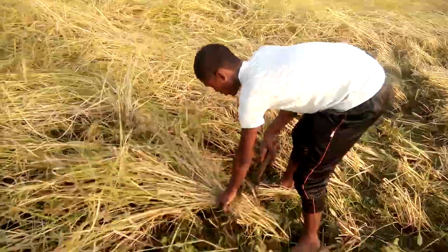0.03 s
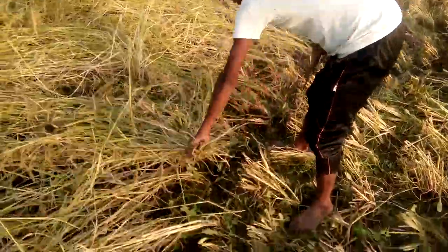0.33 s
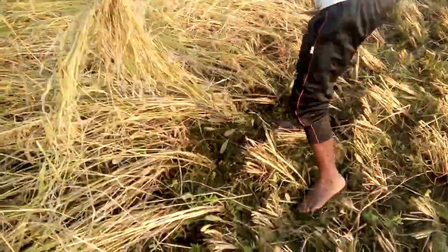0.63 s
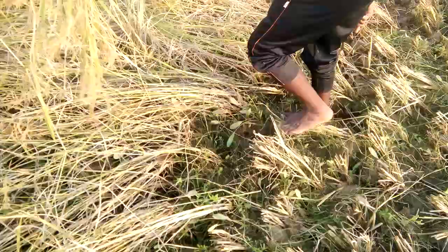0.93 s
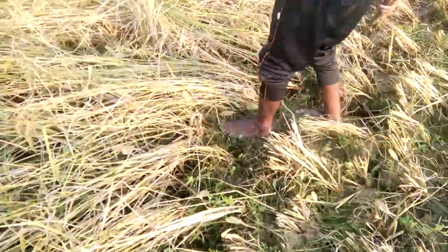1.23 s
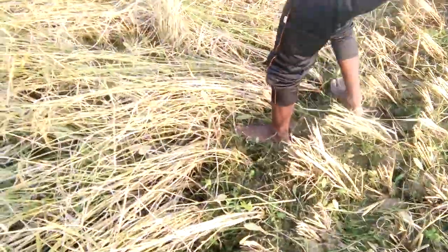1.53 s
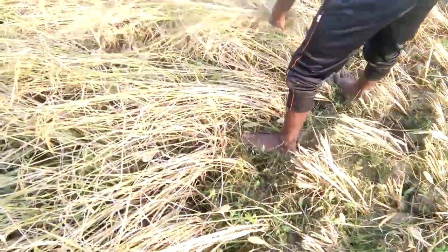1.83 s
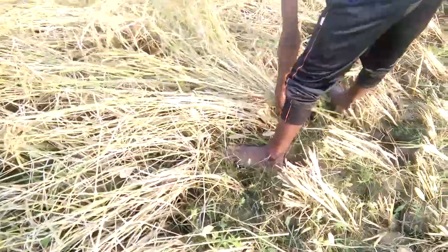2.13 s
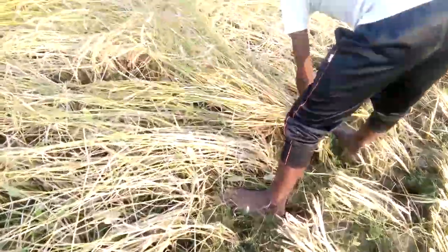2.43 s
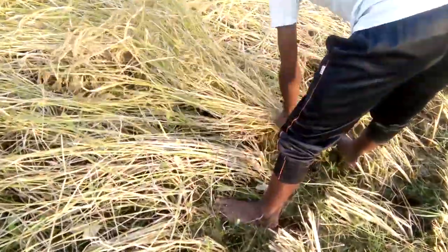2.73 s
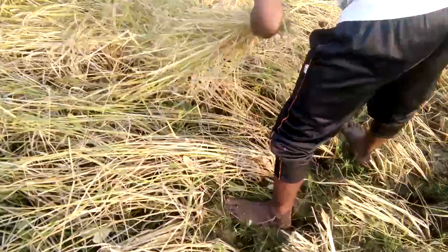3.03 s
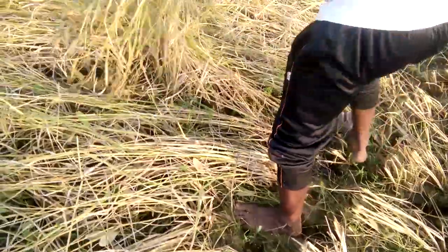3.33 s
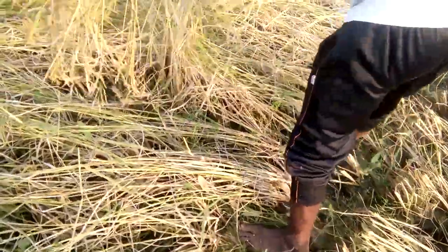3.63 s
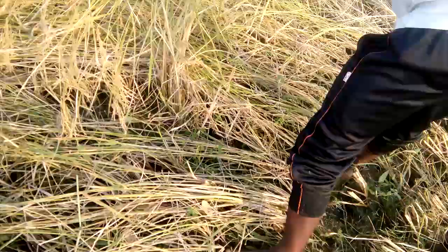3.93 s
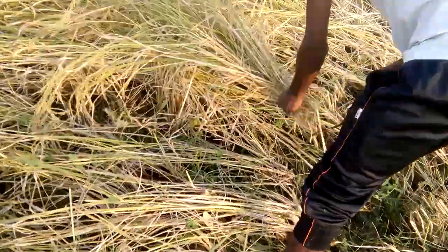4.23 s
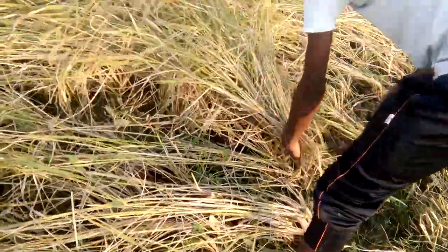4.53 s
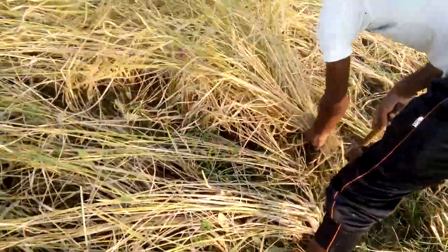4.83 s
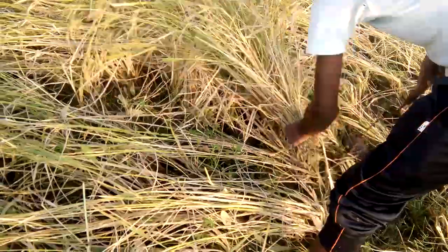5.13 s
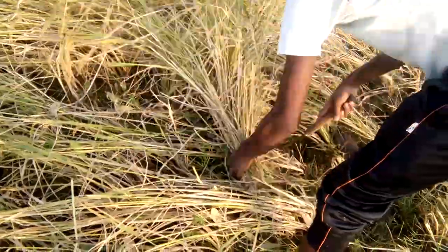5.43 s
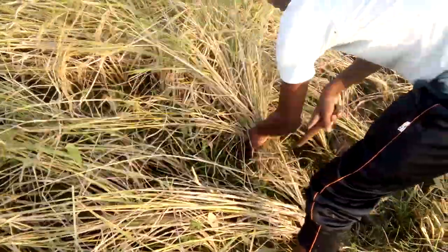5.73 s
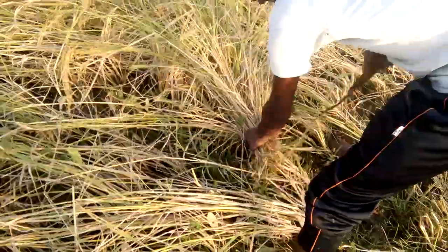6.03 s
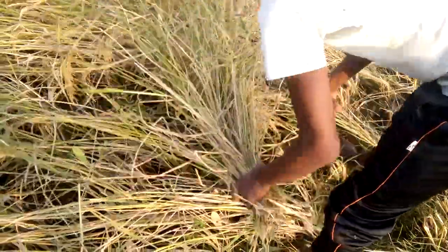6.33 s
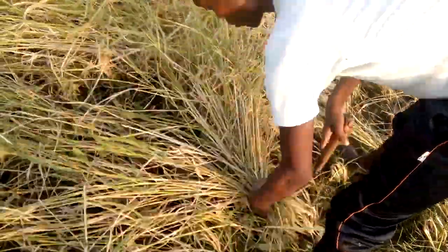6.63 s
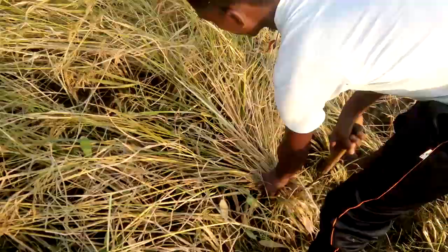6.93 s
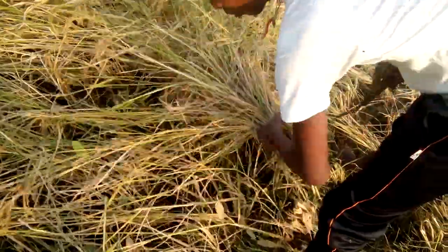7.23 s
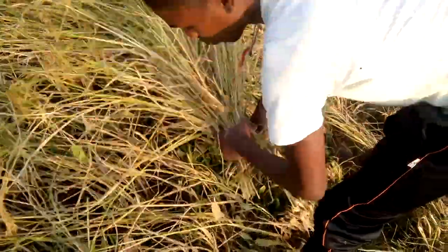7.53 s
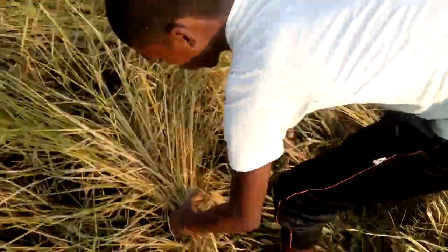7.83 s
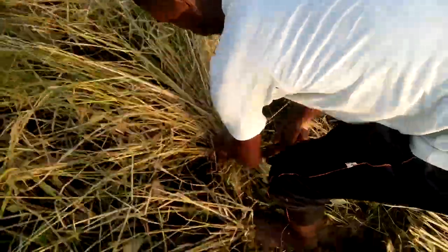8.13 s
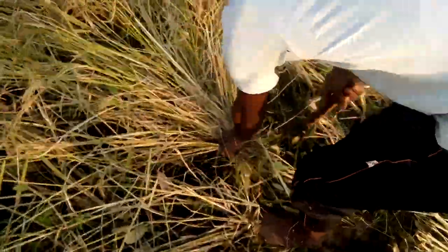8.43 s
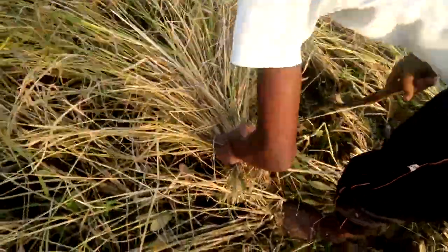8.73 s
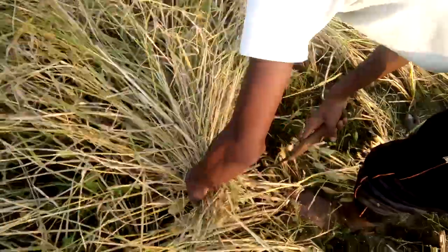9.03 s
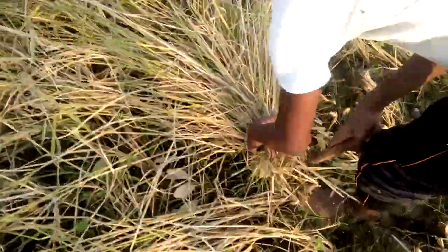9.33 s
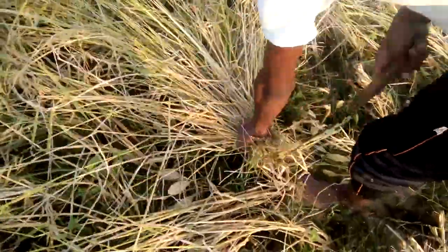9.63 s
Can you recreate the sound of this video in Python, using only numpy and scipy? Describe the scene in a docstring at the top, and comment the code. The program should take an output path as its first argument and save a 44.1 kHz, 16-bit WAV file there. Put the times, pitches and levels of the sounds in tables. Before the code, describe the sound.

Dry rice stalks rustle and crackle as they are gathered by hand, a step or two from the microphone. Six times a sickle pulls through a bunch with a short rasp and a hollow crunch, and stems snap. In the first second, fingers bump and rub the microphone. The cuts come closer together and grow stronger in the second half, over the faint hush of an open field.

```python
"""A sickle cutting ripe rice in an open field, a step or two from the microphone.
The farmer gathers dry stalks in one fist (a rustle of tiny fractures and slips), pulls the toothed
blade through the bunch (a short rasp and a hollow crunch, with stems snapping) and lays the sheaf
aside. Early on, the recordist's fingers bump and rub the microphone housing.
Behind it all lies the faint hush of the field."""
import sys
import numpy as np
from scipy import signal
from scipy.io import wavfile

SR = 44100
rng = np.random.default_rng(int(sys.argv[2]) if len(sys.argv) > 2 else 0)


def digitize_waveform(pressure):
    """Quantize a signal to 16-bit integers and store it at the path in sys.argv[1].

    Rows of a 2-D input are taken as channels; values are limited to [-1, 1].
    """
    field = np.atleast_2d(pressure).T
    bounded = np.clip(field, -1, 1)
    quanta = np.round(bounded * 32767).astype(np.int16)
    wavfile.write(sys.argv[1], SR, quanta)


N = 427329
TIME = np.arange(N) / SR


def amp(db):
    """Decibels to amplitude."""
    return 10 ** (np.asarray(db) / 20)


def evened(x):
    """The signal scaled to unit RMS."""
    return x / np.sqrt(np.mean(x ** 2) + 1e-20)


def add(mix, s, sound):
    """Mixes a sound in at s seconds."""
    part = mix[max(round(s * SR), 0):][:len(sound)]
    part += sound[:len(part)]


def colour(x, points, size=4096):
    """Causal filter with the given spectrum, so that clicks keep their sharp front."""
    hz, db = np.transpose(points)
    bin_hz = abs(np.fft.fftfreq(size, 1 / SR))
    log_gain = np.log(amp(np.interp(np.log(bin_hz + 1), np.log(hz), db)))
    minimum_phase = np.exp(np.conj(signal.hilbert(log_gain)))
    taps = np.fft.ifft(minimum_phase).real[:size // 2]
    return signal.oaconvolve(x, taps)[:len(x)]


def wander(seconds):
    """A smooth random curve of unit spread that changes about once in the given time."""
    knots = rng.standard_normal(N // 20)
    return evened(np.interp(TIME / seconds, np.arange(len(knots)), knots))


def swell(s, rise_s, fall_s, roundness):
    """Strength of one gesture that builds up to the time s and dies away."""
    away = np.maximum((s - TIME) / rise_s, (TIME - s) / fall_s)
    return np.exp(-away ** roundness)


def air(level_db=-72.5):
    """The faint steady hush of the open field around the microphone."""
    # spectrum of the hush: (frequency [Hz], gain [dB])
    hush = [(20, -26), (45, -16), (100, 1), (200, -1.5), (420, -6), (1000, -8.5), (3000, -3), (8000, -34.5),
            (15000, -54)]
    return amp(level_db) * evened(colour(rng.standard_normal(N), hush))


def movements(rest_db=(-59.5, -72, -78.5)):
    """Gains of leaves, stems and grain heads: each arm movement stirs them above the settling straw."""
    # gathering, lifting or laying down stalks: (briskest moment [s], half-length [s],
    # leaf gain [dB], stem gain over leaf gain [dB], head gain over leaf gain [dB])
    arm_moves = [(0.023, 0.32, -54, -4, -15), (0.827, 0.22, -51, -10, -12), (1.204, .11, -60.5, -25, -30),
                 (1.99, 0.083, -50, -23, -12.5), (2.173, .12, -49, -14, -11.5),
                 (2.433, 0.15, -54.5, -14, -13), (3.168, 0.32, -54.5, -12, -10),
                 (3.554, .2, -53.5, -9.5, -11), (4.322, 0.2, -52.5, -12, -11),
                 (4.562, 0.12, -50.7, -11.5, -12), (4.986, .06, -56.5, -12, -13),
                 (5.3, .19, -53.5, -8, -10.5), (5.614, 0.1, -56, -11, -8.5),
                 (5.842, 0.16, -51.5, -9.5, -12), (6.483, 0.16, -50, -10, -10), (6.93, .24, -48, -6.5, -14),
                 (7.452, .1, -50, -7, -10.5), (7.888, .17, -49, -5, -12),
                 (8.207, 0.099, -48.5, -7.5, -15.5), (8.42, 0.097, -52, -10, -13),
                 (8.758, .17, -50.5, -9, -13.5), (9.055, .14, -51, -7.5, -15),
                 (9.475, .16, -46.5, -10.5, -14)]
    power = amp(rest_db)[:, None] ** 2 * np.ones(N)
    for s, half_s, leaf_db, stem_db, head_db in arm_moves:
        stir = swell(s, half_s, 0.99 * half_s, roundness=1.5)
        power += amp(leaf_db + np.array([0, stem_db, head_db]))[:, None] ** 2 * stir
    return np.sqrt(power)


def grains(per_s, spread_db, ring_s, clump_db, clump_s, count=24):
    """Tiny fractures and slips in clumps; each belongs to one of many straws with its own short ring."""
    size = amp(spread_db * np.minimum(rng.exponential(1, N), 4) + clump_db * wander(clump_s))
    clicks = size * rng.choice([-1, 1], N) * (rng.random(N) < per_s / SR) / np.sqrt(per_s)
    straw, t = rng.integers(0, count, N), TIME[:512]
    rings = rng.standard_normal((count, len(t))) * np.exp(-t / ring_s)
    ringing = (signal.oaconvolve(clicks * (straw == k), evened(rings[k]))[:N] for k in range(count))
    return evened(sum(ringing))


def ground(x, delay_s, sway, sway_s, echo_db):
    """Adds the bounce off the soil; its delay sways with the hands' height, so hollow bands drift."""
    late_s = delay_s * np.exp(sway * np.tanh(wander(sway_s)))
    bounce = colour(x, [(1000, -4.0), (2000, -19), (5000, -19)])  # the straw litter soaks up treble
    return x + amp(echo_db) * np.interp(TIME - late_s, TIME, bounce)


def gathering():
    """Leaves crackle, stems slide over each other and the grain heads shake as the bunch is moved."""
    # spectra of dry leaves, stems and grain heads: (frequency [Hz], gain [dB])
    leaf_colour = [(150, -36), (450, -26), (700, -17), (1300, -12), (1750, -11), (2200, -5), (2600, 2),
                   (2950, 0), (3700, -8), (4700, -14), (6300, -22), (9000, -47.5)]
    stem_colour = [(3000, -32), (4500, 2.5), (5500, -1), (6500, -3.5), (7400, -11.5), (9500, -26),
                   (14000, -38.5)]
    head_colour = [(4000, -37.5), (8400, -14.5), (10000, -5), (11400, -4), (13000, -10.5), (15500, -15)]
    leaf_gain, stem_gain, head_gain = movements()
    busy = evened(leaf_gain)  # a brisk movement brings more contacts than a slow one
    crackle = grains(5000 * busy, spread_db=0, ring_s=0.00079, clump_db=0.37, clump_s=0.014, count=40)
    fizz = grains(9000 * busy, spread_db=-0.5, ring_s=0.00041, clump_db=1.36, clump_s=0.014)
    fine = fizz + 0.5 * crackle
    leaves = ground(colour(crackle, leaf_colour), delay_s=0.001696, sway=0.65, sway_s=0.14, echo_db=0)
    return (amp(0.94) * leaf_gain * evened(leaves)
            + amp(-0.5) * stem_gain * evened(colour(fine, stem_colour))
            + amp(1.1) * head_gain * evened(colour(fine, head_colour)))


def handling(grip_db=3.0, grip_s=0.011):
    """Dull bumps and an uneven rub of skin reach the microphone through its housing."""
    # fingers sliding: (firmest moment [s], rise [s], fall [s], level [dB])
    slides = [(0.139, 0.031, 0.031, -40.5), (.255, .04, .05, -48), (.77, 0.032, 0.074, -46.5)]
    # fingers bumping: (time [s], peak [dB], corner frequency, lower is softer [Hz])
    bumps = [(0.0598, -18.5, 1210), (0.0689, -15.5, 674), (0.1463, -28.5, 1500), (0.7166, -25, 850),
             (9.557, -54, 300)]
    # response of the housing: (frequency [Hz], gain [dB])
    housing = [(20, -16), (65, 5.5), (160, 6), (400, 5), (700, 6), (1500, 4.5), (2500, 2.5), (5000, -6.5),
               (12000, -21)]
    rub = rng.standard_normal(N) * amp(grip_db * wander(grip_s))
    pressure = sum(amp(db) * swell(s, rise, fall, roundness=0.89) for s, rise, fall, db in slides)
    out = pressure * evened(colour(rub, housing))
    for s, peak_db, corner_hz in bumps:
        age = 2 * np.pi * corner_hz * TIME[:3000]
        push = colour(age * np.exp(-age), housing)
        add(out, s, amp(peak_db) * push / abs(push).max())
    return out


def pull(start, length, swell_db, ease_db, release_s, bite_s=0.02, peak_share=0.69):
    """Gain of one pull: the teeth catch, the force builds, the last stems part, the blade comes free."""
    t = TIME - start
    force_db = np.interp(t / length, [0, peak_share, 1], [-swell_db, 0, -ease_db])
    return np.clip(t / bite_s, 0, 1) * amp(force_db) * np.exp(-np.maximum(t - length, 0) / release_s)


def resonate(x, hz, width_hz):
    """A resonance that follows the curve hz."""
    turn = np.exp(2j * np.pi * np.cumsum(hz) / SR)
    pole = np.exp(-np.pi * width_hz / SR)
    return 2 * (turn * signal.lfilter([1 - pole], [1, -pole], x / turn)).real


def sickle(hollow_start_hz=1360, width_hz=760, linger_s=0.015):
    """The teeth tear fibres stem after stem, in bursts of milliseconds; the hollow straw crunches."""
    # pulls of the blade: (start [s], length [s], rasp gain [dB], crunch gain [dB], final pitch [Hz])
    pulls = [(0.178, 0.176, -39, -53, 960), (2.702, 0.13, -47, -54, 716), (5.086, 0.091, -46.5, -54.5, 690),
             (6.023, 0.13, -37, -51, 437), (7.095, 0.12, -37.5, -50.5, 490), (8.446, 0.19, -35.5, -53, 630)]
    # spectra of the rasping teeth and the crushed straw: (frequency [Hz], gain [dB])
    teeth_colour = [(100, -34), (340, -16), (480, -25), (1500, -27), (2050, -1), (2680, 6.5), (3400, -5),
                    (4400, -14.5), (6100, -15.5), (8200, -21.5), (12300, -23.5), (15500, -30)]
    straw_colour = [(150, -17), (430, -36.5), (680, 10), (1000, 17), (1500, 17), (2500, -1), (5000, -59)]
    tearing = grains(per_s=2600, spread_db=3.0, ring_s=0.0025, clump_db=2.5, clump_s=0.004)
    tearing = ground(tearing, delay_s=0.00278, sway=0.27, sway_s=0.1, echo_db=-11.5)
    rasp_gain = sum(amp(db) * pull(s, length, swell_db=7.5, ease_db=2.5, release_s=0.013)
                    for s, length, db, _, _ in pulls)
    crunch_gain = sum(amp(db) * pull(s, length, swell_db=10.5, ease_db=2, release_s=linger_s)
                      for s, length, _, db, _ in pulls)
    # the crunch falls in pitch through each pull, as the blade bites deeper into the bunch
    ends = [end for s, length, *_ in pulls for end in (s, s + length + linger_s)]
    pitches = [hz for *_, low_hz in pulls for hz in (hollow_start_hz, low_hz)]
    hollow_hz = np.exp(np.interp(TIME, ends, np.log(pitches)))
    hollow = resonate(resonate(tearing, hollow_hz, width_hz), hollow_hz, width_hz)
    hollow = colour(hollow, [(70, -22), (300, -3)])  # thin straw radiates little bass
    crunch = amp(-3) * evened(hollow) + amp(-5) * evened(colour(tearing, straw_colour))
    rasp = amp(-1.5) * evened(colour(tearing, teeth_colour))
    return rasp_gain * rasp + crunch_gain * crunch


def snap(brightness, ground_s=0.0025, ground_db=-7, straw_s=0.008, straw_db=-34,
         split_db=-17, split_s=0.002):
    """One crack, a burst of splitting fibres, a brief scatter in the straw and the ground bounce."""
    # spectrum of a breaking stem: (frequency [Hz], gain [dB])
    crack_colour = [(100, -75), (400, -38), (650, -13.5), (1300, -16), (1700, -9.5), (2750, 4),
                    (3400, -3.5), (4700, -9.5), (6300, -16.5), (8300, -29.5), (11500, -20.5), (15500, -28)]
    t = TIME[:3000]
    splitting, scatter = rng.standard_normal((2, len(t)))
    crack = amp(split_db) * splitting * np.exp(-t / split_s)
    crack += amp(straw_db) * scatter * np.exp(-t / straw_s)
    crack[0] += 1
    at_mic = crack.copy()
    add(at_mic, ground_s * rng.uniform(0.713, 1.4), amp(ground_db) * crack)
    brittle_db = 0.8 * (brightness + 24)  # thin dry stems break brighter than thick ones
    sound = colour(colour(at_mic, crack_colour), [(2800, 0), (5600, brittle_db)])
    return sound / np.linalg.norm(sound) * np.sqrt(0.004 * SR)  # the energy of 4 ms at unit RMS


def snaps():
    """Stems give way under the blade, the fist or a foot."""
    # single stems breaking: (time [s], level over 4 ms [dB], brightness [-24 is neutral])
    breaks = [(0.2946, -36, -24), (.342, -39, -36), (0.804, -47, -12), (1.249, -48.5, -24),
              (1.527, -50.5, -35), (2.57, -47, -35), (2.7234, -45, -50), (2.822, -39, -33),
              (3.493, -45, -30), (3.74, -47, -16), (4.724, -44.5, -22.5), (5.6224, -23.5, -33),
              (5.167, -42.5, -22), (6.117, -36, -20), (6.14, -38, -31), (7.104, -36.5, -30),
              (7.1828, -35, -25), (7.2014, -34, -32), (7.219, -36.5, -30), (7.277, -44, -21),
              (7.955, -40, -34), (8.064, -36, -10), (8.5302, -35.5, -24), (8.56, -45, -26),
              (8.579, -36, -37), (8.6052, -30, -38), (8.6257, -40, -40), (8.781, -42, -17),
              (8.843, -38, -33), (8.991, -46.5, -26)]
    out = np.zeros(N)
    for s, level_db, brightness in breaks:
        add(out, s, amp(level_db) * snap(brightness))
    return out


def ticks(count=45, over_leaf_db=-3, spread_db=4):
    """Small straws give way at random, louder the more the bunch is being stirred."""
    out, leaf_gain = np.zeros(N), movements()[0]
    for when, strength, thinness in rng.random((count, 3)):
        size = leaf_gain[int(when * N)] * amp(over_leaf_db + spread_db * (2 * strength - 1))
        add(out, when * N / SR, size * snap(brightness=-21 + 6 * (2 * thinness - 1)))
    return out


def scene():
    """The harvest at one microphone, a step or two from the farmer."""
    return (gathering() + sickle() + snaps() + handling() + air() + ticks())[None]


def record(dry):
    """The recorder's band limit."""
    lowpass = signal.firwin(511, cutoff=15600, window=("kaiser", 9), fs=SR)
    return signal.oaconvolve(dry, lowpass[None], "same")


dry = scene()
out = record(dry)
digitize_waveform(out)
```